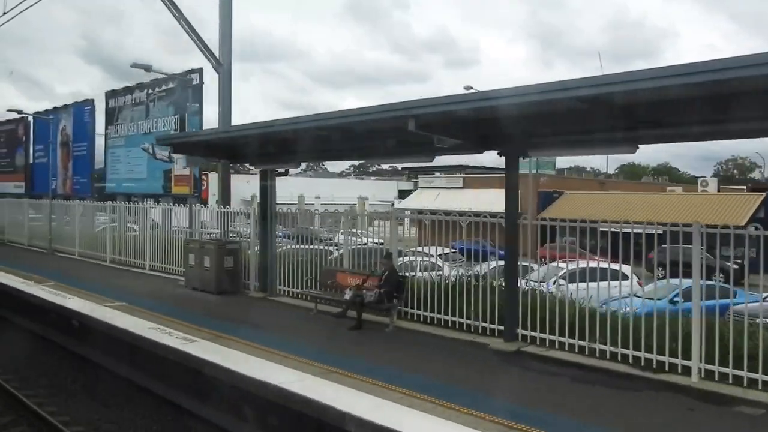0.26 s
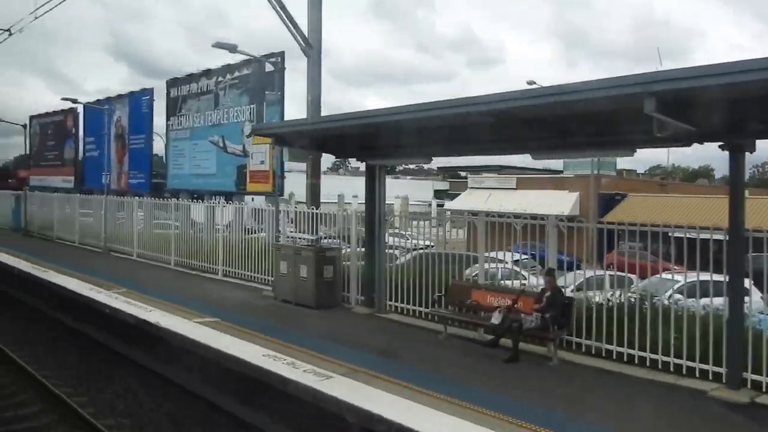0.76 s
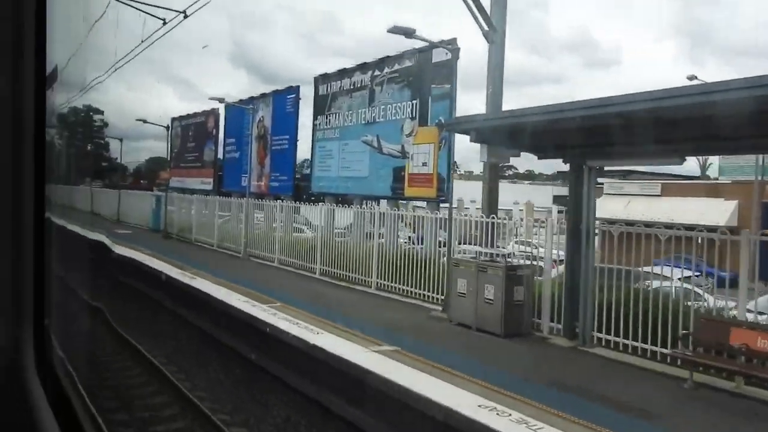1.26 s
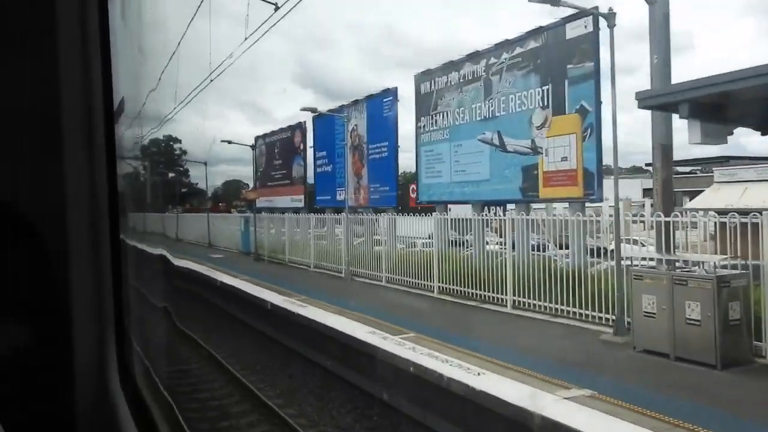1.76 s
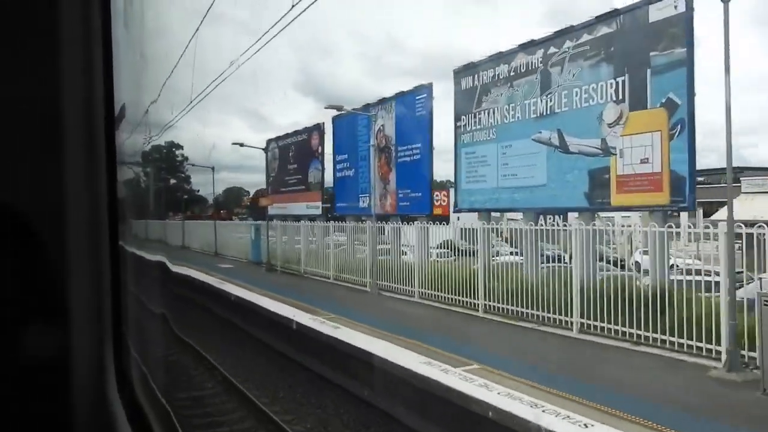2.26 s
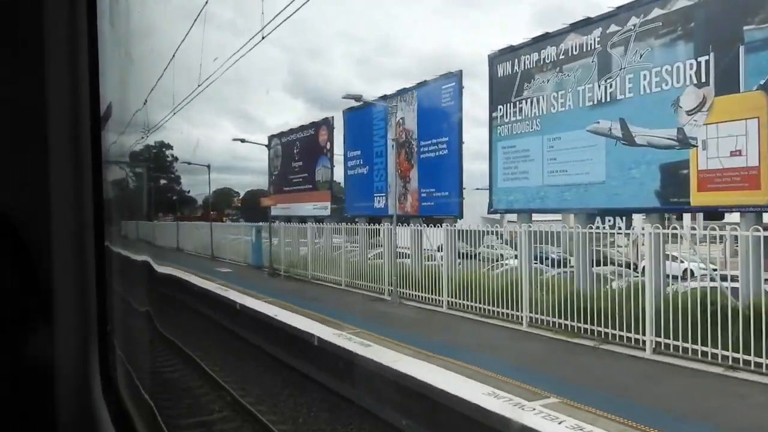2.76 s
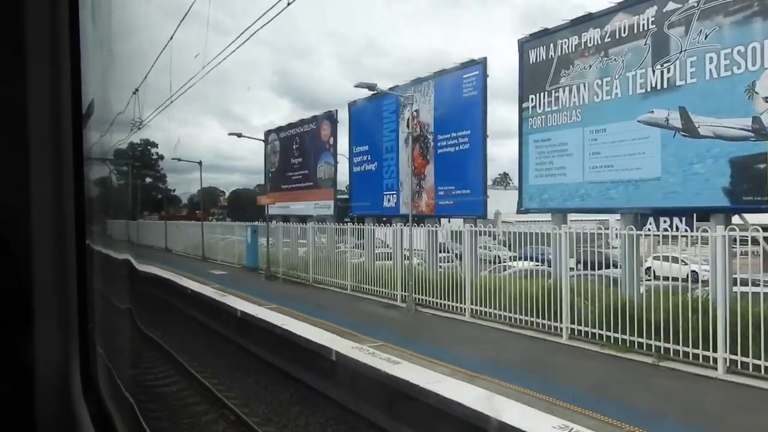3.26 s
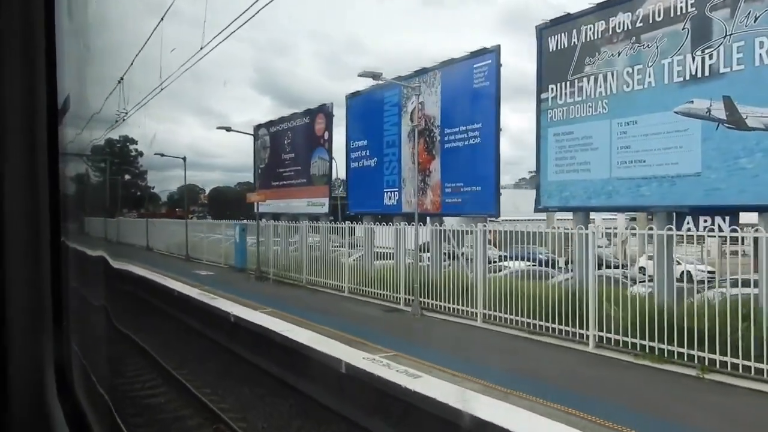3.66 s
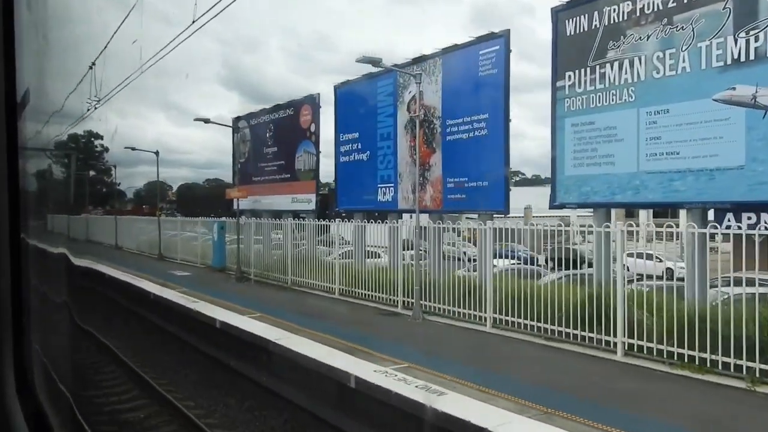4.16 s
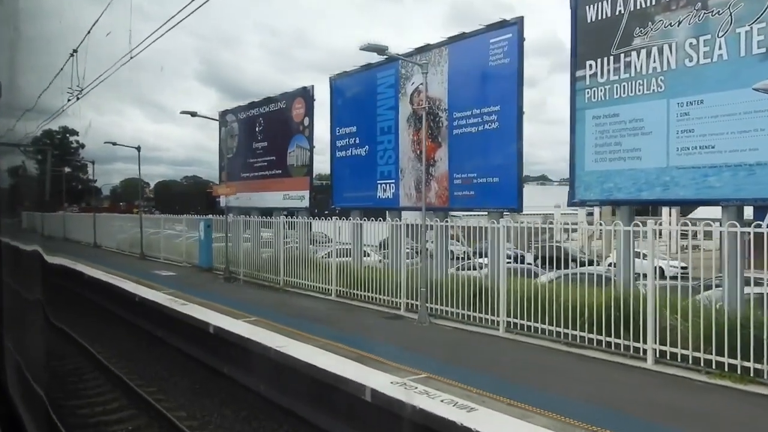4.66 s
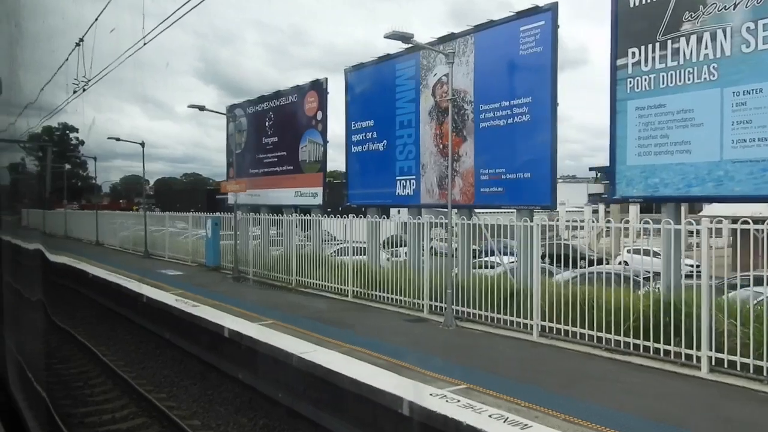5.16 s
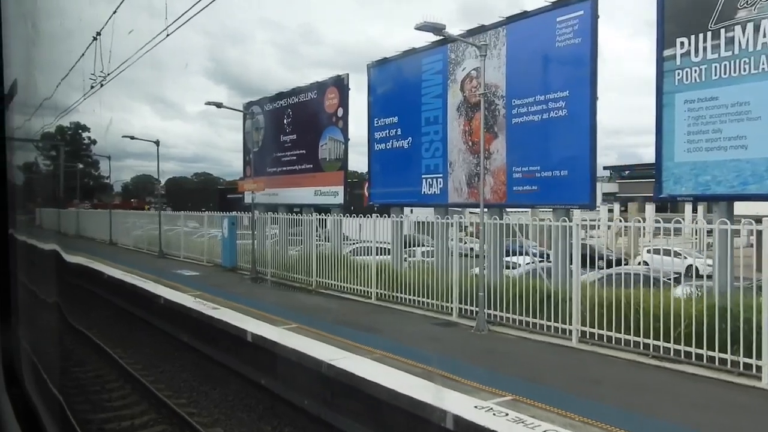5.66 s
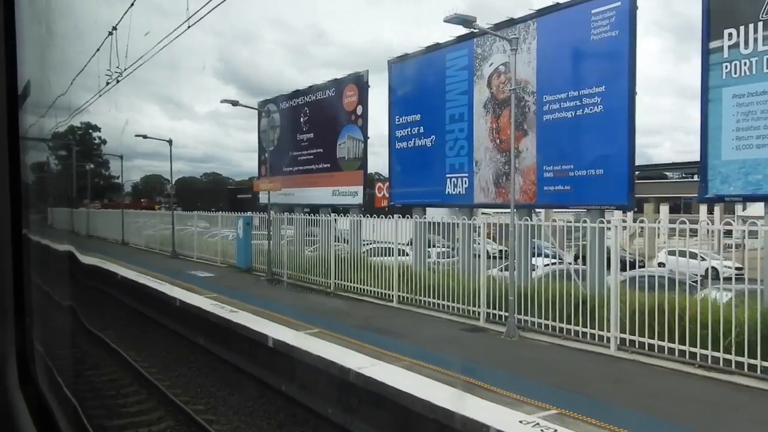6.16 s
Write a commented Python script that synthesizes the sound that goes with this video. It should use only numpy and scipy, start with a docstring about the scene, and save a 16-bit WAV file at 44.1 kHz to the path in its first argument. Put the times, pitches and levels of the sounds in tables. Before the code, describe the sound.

Low wavering motor drone and ventilation rush heard from a train seat, with small hissing valve puffs, a few clicks and barely audible squeaks.

```python
"""Steady fan and motor hum, two wavering drones, body boom and duct roar inside a slow electric train carriage.
Hum and drones are drifting sines; boom, roar and vent hiss are shaped stereo noise; the ducts resonate in bands.
An air valve puffs now and then: noise with a broad whistle, the largest puff with a low push.
A loose fitting ticks on the right as decaying rings; a far wheel squeaks in thin rising tones."""
import sys
import numpy as np
from scipy import signal
from scipy.fft import rfft, irfft, next_fast_len
from scipy.io import wavfile
from scipy.ndimage import uniform_filter1d, map_coordinates

SR = 44100
rng = np.random.default_rng(int(sys.argv[2]) if len(sys.argv) > 2 else 0)


def transcribe(u):
    """Save the signal u as a 16-bit wav file named by the first command-line argument.

    u: samples, shape (n,) or (channels, n), limited to [-1, 1]; the rate is SR.
    q: integer samples, one column per channel.
    """
    v = np.clip(np.atleast_2d(u).T, -1, 1)
    q = np.round(v * 32767).astype(np.int16)
    wavfile.write(sys.argv[1], SR, q)


N = 282240

# steady lines of fans, compressor and supply: f/Hz, level/dB
HUM_LINES = [(39.6, -46), (49.1, -41.5), (64, -51.5), (75, -48.5), (92, -53), (97.9, -44), (100.3, -37.5),
             (282.5, -46.5), (287.5, -49.5), (383, -51.5), (488, -47.5)]
# the two strongest tones: lower f/Hz, upper f/Hz
DRONE_PITCHES = (124.4, 194.15)
# wavering drone levels: t/s, lower level/dB, upper level/dB
DRONE_LEVELS = [(0, -25, -26), (.5, -35, -25.5), (.95, -40.5, -25.5), (1.3, -32.5, -25), (1.62, -23.5, -29),
                (1.9, -31, -38), (2.1, -34, -25.5), (2.5, -30.5, -24), (2.8, -40.5, -26.5), (3.3, -31, -28),
                (3.55, -30.5, -24.5), (3.75, -38, -30), (4.35, -27.5, -22.5), (4.6, -32, -27),
                (4.85, -29, -27.5), (5.2, -41.5, -24.5), (5.55, -27, -27), (5.85, -33.5, -23.5),
                (6.4, -31, -22)]
# faint fuzzy whine of the drive: f/Hz, level/dB
WHINE_LINES = [(3862, -70.5), (3979, -69)]
# body boom spectrum: f/Hz, relative density/dB per Hz
BOOM_SPECTRUM = [(8, -34.5), (21, -17), (45, -14), (63, -5), (76, -3), (86, -6.5), (110, -0.5), (140, 1.5),
                 (153, -5), (167, 0.5), (215, 1.5), (237, -4), (256, -11), (270, -15), (330, -37.5),
                 (600, -120)]
# body boom loudness: t/s, level/dB
BOOM_LEVELS = [(0, -24.5), (1.3, -24), (1.9, -26.5), (2.6, -23), (3.1, -23.5), (4.1, -25.5), (5.3, -25),
               (6.4, -23)]
# duct roar spectrum: f/Hz, relative density/dB per Hz
ROAR_SPECTRUM = [(120, -120), (272, -6), (305, -1), (340, 3.5), (365, -4), (405, 0.5), (470, -6.5),
                 (503, -9), (530, -4.5), (552, -6.5), (630, -5.5), (690, -6), (720, -7.5), (900, -14),
                 (1050, -12.5), (1250, -23.5), (2500, -120)]
# vent hiss spectrum: f/Hz, relative density/dB per Hz
VENT_SPECTRUM = [(500, -120), (1050, -1), (1400, 0.5), (2000, -3), (2700, -6.5), (4200, -6), (5500, -7.5),
                 (6800, -9.5), (8800, -8), (10000, -13), (11300, -23), (12500, -28.5), (13200, -25.5),
                 (15000, -31.5)]
# left-right likeness of the noises: f/Hz, correlation/1
LIKENESS = [(25, .995), (215, .995), (250, .95), (270, .8), (340, .88), (480, .8), (560, .9), (640, .93),
            (1000, .86), (2200, .66), (4800, .52), (7200, .3), (10700, .08)]
# duct resonances, in three pairs: f/Hz, half width/Hz, level over the pair's/dB
DUCT_MODES = [(571.8, 8, -0.5), (585.7, 6, -3.5), (615.5, 9.4, 0), (632.5, 8, -4.5), (657.3, 9, -0.5),
              (679.7, 11, -3.5)]
# wavering levels of the duct pairs: t/s, low pair level/dB, middle pair level/dB, high pair level/dB
DUCT_LEVELS = [(0, -54.5, -47, -50.5), (.35, -48, -43.5, -48), (.65, -42, -45.5, -47), (.9, -46, -46, -46),
               (1.3, -53, -53, -51), (1.62, -46.5, -45, -49.5), (1.9, -47, -45.5, -43.5),
               (2.4, -47, -44.5, -50.5), (2.68, -49, -43.5, -41.5), (2.9, -48.5, -46.5, -47),
               (3.12, -56.5, -53, -48.5), (3.6, -48, -45, -43), (3.87, -47.5, -45.5, -46),
               (4.35, -50.5, -46, -47.5), (4.62, -44.5, -48, -49), (4.9, -49, -50.5, -46.5),
               (5.35, -52, -41.5, -46.5), (5.65, -46, -46, -44), (5.9, -48, -48, -45),
               (6.12, -48, -47, -55), (6.4, -53, -42, -46.5)]
# valve puffs: t of full opening/s, level/dB, rise/s, held open/s, whistle f/Hz,
# whistle width/share of its pitch, whistle over jet/dB
VALVE_PUFFS = [(.385, -45.5, 0.12, 0.045, 3300, 0.11, 11), (.98, -58, .04, .03, 8800, .2, 6.5),
               (1.6, -59, .02, .036, 8800, .2, 7), (1.745, -54, .01, 0.023, 8600, .2, 6),
               (5.51, -52.5, .04, .04, 9000, 0.24, 9), (6.017, -33, 0.04, 0.026, 8400, 0.18, 8)]
# valve jet spectrum: f/Hz, relative density/dB per Hz
JET_SPECTRUM = [(600, -120), (1400, 1), (2100, -14), (2780, -2), (3250, -7.5), (3750, -2), (4150, -6),
                (4650, -3.5), (5200, -6.5), (5900, 1), (6900, -5), (7800, -5.5), (8450, -6.5), (8750, -1.5),
                (9200, -5.5), (9900, -6.5), (10450, -15), (11500, -25), (15000, -44)]
# ticks of the loose fitting: t/s, level/dB, ring f/Hz, held/s, t60/s, overtone over ring/dB
FITTING_TICKS = [(1.205, -49.5, 1864, 0.035, 0.05, -28), (1.3, -55, 1900, 0.018, .05, -30),
                 (1.593, -49, 2060, 0.009, .06, -13), (1.627, -52, 2030, .01, .06, -18),
                 (1.754, -46, 1950, .002, .018, -2), (1.7658, -43, 4350, 0.00031, .006, -2)]
# thin squeaks: start t/s, length/s, first f/Hz, last f/Hz, level/dB
SQUEAK_GLIDES = [(2.555, .075, 10050, 10420, -65.5), (2.652, .15, 9400, 11050, -63),
                 (4.66, .07, 12000, 12550, -77), (4.793, .15, 10650, 12300, -72),
                 (5.74, .08, 9900, 9950, -61)]
# microphone port balance: f/Hz, left over right/dB
PORT_LEAN = [(22, -6.5), (60, -3.3), (100, -2), (160, -1.3), (215, -1.1), (240, .5), (272, 7.2), (310, 4.5),
             (400, 3.7), (460, 6.5), (487, 9.5), (510, 4.5), (615, 0), (750, 1.3), (3200, .5), (7200, -1.5),
             (11000, 0)]
# microphone port phase: f/Hz, lead of the left port/rad
PORT_LEAD = [(30, .55), (100, .37), (220, .2), (270, .3), (330, .12), (4200, .1), (7150, .3), (8530, 1.1),
             (10900, .3)]

DRONE_WAVER_DB, DRONE_WAVER_KNOTS_PER_S = 2, 10
ROAR_DB, VENT_DB, DUCT_WAVER_DB = -37.5, -47.5, 1.5
PUFF_LEAN_DB = -.3
# below SPLIT_HZ the hiss comes later and falls at its own rate
SPLIT_HZ, LOW_LATE_S, LOW_T60_S, HIGH_T60_S = 7100, 0.0076, 0.42, 0.4
# middle band of the jet: changes by FILL_DB_PER_DB per dB away from the wide-open level
WIDE_OPEN_DB, FILL_DB_PER_DB = -35, .9
# bright spit at full opening: level relative to the puff, lowest f, half width
SPIT_DB, SPIT_HZ, SPIT_HALF_WIDTH_S = -15, 11300, .006
TICK_LEAN_DB, OVERTONE_RATIO, RATTLE_DEPTH = -6, 1.48, .4
SQUEAK_LEAN_DB, SQUEAK_RISE_S, SQUEAK_FADE_DB = -1.5, .018, 13
THUD_S, THUD_HZ, THUD_DB, THUD_HALF_WIDTH_S = 6.05, 65.4, -31, .1
TOP_HZ = 14990


def amp(db):
    """Gain of a level in dB."""
    return 10 ** (np.asarray(db) / 20)


def unit(x):
    """x at rms 1."""
    return x / np.sqrt(np.mean(x ** 2) + 1e-20)


def sides(lean_db):
    """Left and right gains of a left-right level difference."""
    return amp(np.array([lean_db / 2, -lean_db / 2]))


def along(points, hz):
    """(Hz, value) points interpolated on a log frequency axis."""
    f, v = np.transpose(points)
    return np.interp(np.log(hz + 1), np.log(f + 1), v)


def curves(rows):
    """One value per sample for each column after the time."""
    s, *cols = np.transpose(rows)
    return [np.interp(np.arange(N) / SR, s, c) for c in cols]


def wobble(knots_per_s):
    """Smooth random curve through normally distributed knots."""
    knots = rng.standard_normal(int(N * knots_per_s / SR) + 4)
    return map_coordinates(knots, [np.arange(N) * knots_per_s / SR])


def filtered(x, response):
    """x times a response of frequency."""
    m = next_fast_len(N + 8192)
    return irfft(rfft(x, m) * response(np.fft.rfftfreq(m, 1 / SR)), m)[..., :N]


def rush(spectrum, patchy_db):
    """Stereo noise of rms 1: random gain patches in time and frequency, left-right likeness by frequency."""
    z = signal.stft(rng.standard_normal((2, N)), nperseg=512)[2]
    field = uniform_filter1d(rng.standard_normal(z.shape[1:]), size=8, axis=0)
    field = uniform_filter1d(field, size=14, axis=1)
    pair = signal.istft(z * amp(patchy_db * unit(field)), nperseg=512)[1][:, :N]

    def mid_side_gains(hz):
        # the cosine of twice this angle is the left-right correlation
        angle = np.arccos(np.clip(along(LIKENESS, hz), -1, 1)) / 2
        return amp(along(spectrum, hz)) * [np.cos(angle), np.sin(angle)]

    mid, side = filtered(pair, mid_side_gains)
    return unit(np.array([mid + side, mid - side]))


def tone(hz, drift_rad):
    """Sine of rms 1 with random start and slow phase drift."""
    cycles = np.cumsum(hz * np.ones(N)) / SR + rng.random()
    return np.sqrt(2) * np.sin(2 * np.pi * cycles + drift_rad * wobble(1.968))


def machines():
    """Steady shaft, blade and supply lines, two wavering drones and a faint drive whine."""
    lines = sum(amp(db + 0.31 * wobble(1.2)) * tone(hz, drift_rad=0.098) for hz, db in HUM_LINES)
    lower_db, upper_db = curves(DRONE_LEVELS)
    lower_gain = amp(lower_db + DRONE_WAVER_DB * wobble(DRONE_WAVER_KNOTS_PER_S))
    upper_gain = amp(upper_db + DRONE_WAVER_DB * wobble(DRONE_WAVER_KNOTS_PER_S))
    lower = lower_gain * tone(DRONE_PITCHES[0] + 2.52 * wobble(6), drift_rad=1.11)
    upper = upper_gain * tone(DRONE_PITCHES[1], drift_rad=0.14)
    whine = sum(amp(db + 1.6 * wobble(12)) * tone(hz + 6 * wobble(25), drift_rad=0.65)
                for hz, db in WHINE_LINES)
    return lines + lower + upper + whine


def airflow():
    """Body boom, duct roar and smooth vent hiss: shaped noises, each breathing a little on its own."""
    boom_db, = curves(BOOM_LEVELS)
    boom = amp(boom_db + 0.65 * wobble(5.04)) * rush(BOOM_SPECTRUM, patchy_db=0.5)
    roar = amp(ROAR_DB + 0.24 * wobble(4.03)) * rush(ROAR_SPECTRUM, patchy_db=1.68)
    vent_db = VENT_DB + 0.58 * wobble(4.02) + 0.091 * wobble(7.5)
    vent = amp(vent_db) * rush(VENT_SPECTRUM, patchy_db=1.1)
    return boom + roar + vent


def duct():
    """Airflow noise excites pairs of narrow duct resonances, whose levels waver irregularly."""
    levels_db = curves(DUCT_LEVELS)
    out = np.zeros(N)
    for k, (hz, half_width_hz, db) in enumerate(DUCT_MODES):
        resonance = lambda f: 1 / (1 + ((f - hz) / half_width_hz) ** 2)
        blown = unit(filtered(rng.standard_normal(N), resonance))
        out += amp(levels_db[k // 2] + db + DUCT_WAVER_DB * wobble(2.99)) * blown
    return out


def valve():
    """Jet noise with a broad whistle swells as the valve opens, holds, then the pressure runs down."""
    out, t = np.zeros((2, N)), np.arange(N) / SR
    hump = lambda hz, centre_hz, width: np.exp(-(np.log((hz + 1) / centre_hz) / width) ** 2)
    air = rush(JET_SPECTRUM, patchy_db=2.0)
    spit_response = lambda hz: (hz > SPIT_HZ) * amp(along(JET_SPECTRUM, hz))
    spit = unit(filtered(rng.standard_normal((2, N)), spit_response))
    for s, db, rise_s, held_s, whistle_hz, width, whistle_db in VALVE_PUFFS:
        # a wide-open valve fills in the band between the low and the high hiss
        fill_db = FILL_DB_PER_DB * (db - WIDE_OPEN_DB)
        colour = lambda hz: amp(whistle_db * hump(hz, whistle_hz, width) + fill_db * hump(hz, 5700, 0.19))
        jet = unit(filtered(air, colour))
        low = filtered(jet, lambda hz: 1 / (1 + (hz / SPLIT_HZ) ** 8))
        for part, late_s, t60_s in ((jet - low, 0, HIGH_T60_S), (low, LOW_LATE_S, LOW_T60_S)):
            progress = np.clip(1 + (t - s - late_s / 2) / (rise_s - late_s / 2), 0, 1)
            opening = np.sin(np.pi / 2 * progress) ** 2
            rundown = amp(db - 60 * np.maximum(t - s - held_s, 0) / t60_s)
            out += rundown * opening * part
        out += amp(db + SPIT_DB) * np.exp(-((t - s) / SPIT_HALF_WIDTH_S) ** 2) * spit
    flutter = amp(1.5 * wobble(90))
    return sides(PUFF_LEAN_DB)[:, None] * out * flutter


def fitting():
    """Each tick rings at two pitches, roughened by rattle, then decays exponentially."""
    out, t = np.zeros(N + SR), np.arange(SR // 4) / SR
    for s, db, hz, held_s, t60_s, over_db in FITTING_TICKS:
        smoothing = max(1, int(6 * SR / hz))  # samples: six ring periods
        rough = unit(uniform_filter1d(rng.standard_normal(len(t)), smoothing))
        rattle = 1 + RATTLE_DEPTH * rough
        overtone = amp(over_db) * np.sin(2 * np.pi * OVERTONE_RATIO * hz * t)
        ring = np.sin(2 * np.pi * hz * t) + overtone
        onset = 1 - np.exp(-t / .0004)
        decay = amp(db - 60 * np.maximum(t - held_s, 0) / t60_s)
        out[round(s * SR):][:len(t)] += decay * onset * rattle * ring
    return np.outer(sides(TICK_LEAN_DB), out[:N])


def squeaks():
    """Thin wheel tones that glide up, flutter and fade."""
    out, t = np.zeros(N), np.arange(N) / SR
    for s, length_s, first_hz, last_hz, db in SQUEAK_GLIDES:
        gone = np.clip((t - s) / length_s, 0, 1)
        onset = np.clip((t - s) / SQUEAK_RISE_S, 0, 1) ** 2
        gain = amp(db - SQUEAK_FADE_DB * gone + 2.7 * wobble(60))
        glide_hz = first_hz + (last_hz - first_hz) * np.sin(np.pi / 2 * gone)
        out += onset * gain * (gone < 1) * tone(glide_hz, drift_rad=0)
    return np.outer(sides(SQUEAK_LEAN_DB), out)


def thud():
    """Soft low push with the largest puff: a bell-shaped swell of the car body's tone."""
    t = np.arange(N) / SR
    swell = np.exp(-((t - THUD_S) / THUD_HALF_WIDTH_S) ** 2)
    return amp(THUD_DB) * swell * tone(THUD_HZ, drift_rad=0.33)


def scene():
    """Sum of all carriage sounds, stereo."""
    return machines() + airflow() + duct() + valve() + fitting() + squeaks() + thud()


def record(dry):
    """Two microphone ports unequal in level and phase, a band limit and a small constant offset."""
    def ports(hz):
        phase_rad = .5 * np.outer([1, -1], along(PORT_LEAD, hz))
        return sides(along(PORT_LEAN, hz)) * np.exp(1j * phase_rad)

    return filtered(dry, lambda hz: ports(hz) * (hz < TOP_HZ)) - .0018


dry = scene()
out = record(dry)
transcribe(out)
```